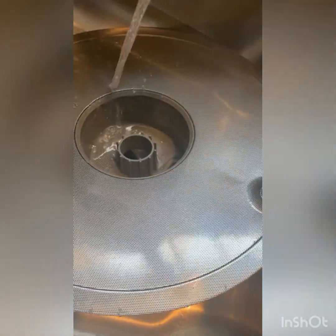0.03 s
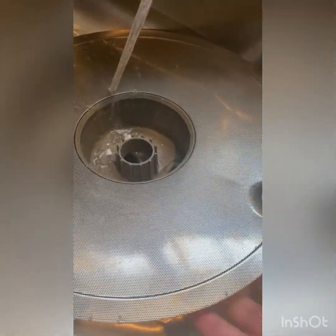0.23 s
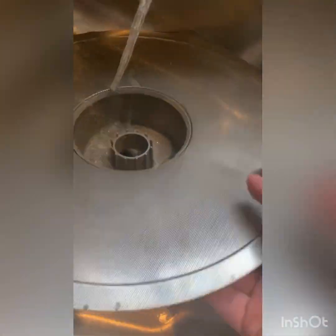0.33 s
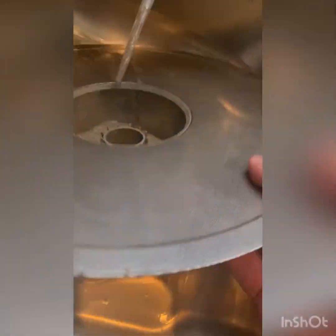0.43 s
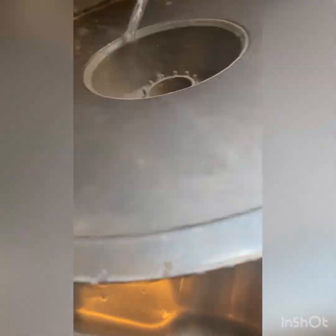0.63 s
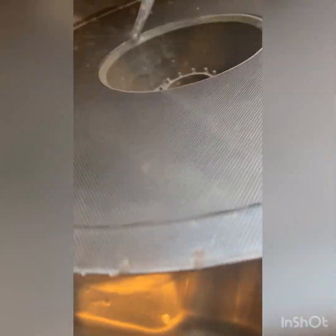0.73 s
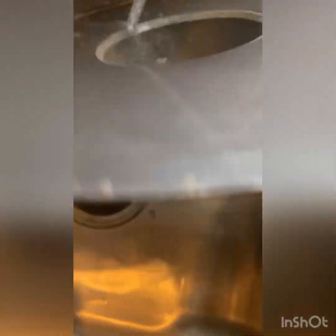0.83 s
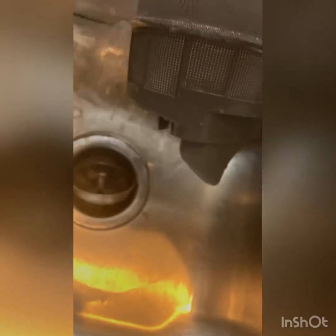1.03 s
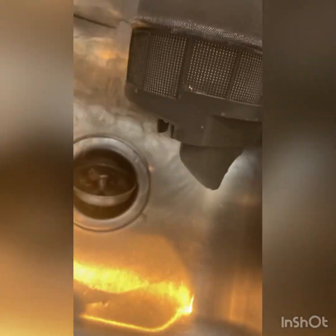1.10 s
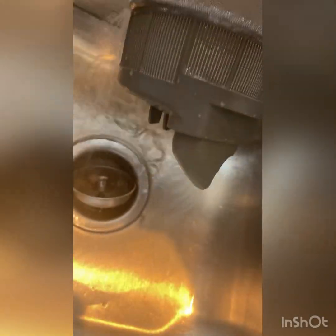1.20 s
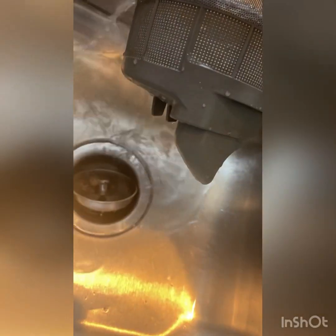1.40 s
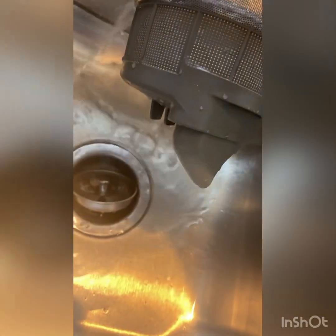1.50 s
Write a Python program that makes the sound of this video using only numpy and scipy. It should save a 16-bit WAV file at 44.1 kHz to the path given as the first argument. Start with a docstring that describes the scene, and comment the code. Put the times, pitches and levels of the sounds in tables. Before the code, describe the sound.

Water sprays and patters in a steel dishwasher while a filter knocks and pulls free.

```python
"""Rinsing a dishwasher filter

A thin jet of water runs into a steel dishwasher tub while a hand lifts out the filter.
The jet sizzles on the filter's mesh plate, then falls past it to patter and drum on the tub floor.
The plate knocks as it is gripped and pulls free with a boom of the tub. Water sloshes and drips
off the filter, and its plastic cup clacks and rubs on its seat."""
import sys
import numpy as np
from scipy import signal
from scipy.fft import rfft, irfft
from scipy.io import wavfile

SR = 44100
rng = np.random.default_rng(int(sys.argv[2]) if len(sys.argv) > 2 else 0)


def store_pcm(level_fs):
    """Save levels as 16-bit WAV."""
    pcm = np.round(np.clip(level_fs, -1, 1) * 32767).astype(np.int16)
    wavfile.write(sys.argv[1], SR, np.atleast_2d(pcm).T)


N = 68355

# A tone table says how strong the low and high parts of a noise are, compared with each other.
# How loud the jet sizzles on the mesh: time_s, level_db
SIZZLE_LEVEL = [(0, -30), (.19, -33.5), (.24, -27), (.33, -27.5), (.41, -32.5), (.46, -29), (.52, -23),
                (.56, -38), (.62, -30.5), (.75, -35), (.9, -50), (1.22, -42), (1.32, -47), (1.55, -75.5)]
# Tone of the sizzle: pitch_hz, level_db
SIZZLE_TONE = [(300, -25), (2000, -19), (3500, -8), (5200, -1), (7500, -2), (9500, 0), (12000, -3),
               (14500, -2.5), (16000, -9)]
# Large drops that spit on the metal: start_s, level_db
SPIT_TIMES = [(.060, -16.5), (0.163, -19.5), (0.338, -18), (0.456, -27), (0.475, -36), (0.608, -20),
              (0.784, -30)]
# Tone of a spit: pitch_hz, level_db
SPIT_TONE = [(300, -25), (2000, -10), (4300, 0), (6000, -1), (16000, -10)]
# Thin notes of the steel under the jet: pitch_hz, width_hz, level_db
STEEL_NOTES = [(4100, 25, -50.5), (4920, 780, -45.5)]
# Tone of the patter on the tub floor: pitch_hz, level_db
PATTER_TONE = [(100, -10), (400, -1), (700, -1), (1300, -2), (2000, -3), (3000, -1), (4400, 1), (5800, 1),
               (7000, -2.5), (10000, -3), (14000, -5), (16000, -11)]
# Tone of the tub's drumming: pitch_hz, level_db
DRUMMING_TONE = [(20, -36), (45, -18), (65, -0.5), (95, -1.5), (120, 8), (155, -1.5), (212, 0.5),
                 (260, -2.5), (320, -12), (450, -15.5), (900, -17.5), (3000, -102)]
# How loud the tub drums: time_s, level_db
DRUMMING_LEVEL = [(0, -31), (.12, -37.5), (.19, -36), (.3, -30), (.42, -40.5), (.7, -30), (.83, -41),
                  (1.05, -36.5), (1.14, -32), (1.27, -34), (1.34, -38), (1.41, -32.5), (1.55, -39.5)]
# Knocks of the filter: start_s, plate_db, tub_db, cup_db, crack_db, hardness_db_per_octave
KNOCK_TIMES = [(0.208, -8.5, -22, -20, -10, 0), (0.2143, -31, -33, -37, -15, 3),
               (0.2304, -28, -21, -23, -17.5, 1), (0.3, -22.5, -25, -46, -19, 3.5),
               (.5180, -13, -3.5, -23, -1.5, -1), (0.73, -27.5, -34.5, -55, -51, 0.5),
               (0.9151, -14.5, -30, 0, -12.5, 0), (0.924, -44, -50, -35, -21.5, -4),
               (0.934, -22, -21.5, -13.5, -49, -1.5), (1.246, -30, -36, -52, -58, -6.5)]
# Notes of the mesh plate: pitch_hz, level_db, ring_s (the time to fade by 60 dB)
PLATE_NOTES = [(202.6, -0.5, 0.087), (266.5, -5, 0.13), (526, 1.5, 0.047), (719, -9.5, 0.11),
               (928, -17, 0.087), (1252, -10.5, 0.076), (1407, -11, 0.045), (1777, -23, 0.17),
               (2390, -19, 0.035), (2705, -23, 0.088), (3540, -19.5, 0.068), (4600, -39, 0.04)]
# Notes of the steel tub: pitch_hz, level_db, ring_s
TUB_NOTES = [(56.7, -14.5, 0.12), (88, 0, 0.068), (128.4, -18, 0.24), (153, 0.5, 0.029), (221, -7.5, 0.11),
             (323.2, -8.5, 0.19), (381.4, 2.5, 0.047), (360, -27.5, 0.69), (536, -10.5, 0.037),
             (552, -26.5, 0.8), (705, -37, 0.62)]
# Notes of the plastic cup: pitch_hz, level_db, ring_s
CUP_NOTES = [(258.7, -4, 0.081), (607, -14, 0.066), (856, -10.5, 0.04), (984, -1, 0.043),
             (1175, -15, 0.071), (1359, -7, 0.032), (1594, -11.5, 0.032), (1987, -12, 0.037),
             (2373, -13, 0.03), (2890, -15, 0.028), (3384, -22.5, 0.06), (3623, -14, 0.017),
             (4527, -14, 0.026)]
# Tone of the crack as two parts meet: pitch_hz, level_db
CRACK_TONE = [(100, 11.5), (700, 1), (1800, 4.5), (2800, -1), (4400, 4.5), (6800, 4.5), (9500, -0.5),
              (13500, 2.5), (16000, -9)]
# Tone of the sheet steel shuddering after a knock: pitch_hz, level_db
SHUDDER_TONE = [(200, -18), (290, 1.5), (365, 4), (410, -13.5), (465, 3), (505, -21), (548, 8.5),
                (620, -9.5), (720, 2.5), (820, -19), (2000, -19), (4000, -19.5), (9000, -30)]
# Water sloshing off the moving filter: start_s, length_s, level_db
SLOSH_TIMES = [(0.211, 0.16, -34), (0.684, 0.1, -40.5), (0.992, 0.066, -37)]
# Tone of a slosh: pitch_hz, level_db
SLOSH_TONE = [(200, -14), (600, 6), (900, 2), (1400, 5.5), (1900, -5), (2600, 5.5), (6000, -17),
              (16000, -44)]
# Booms of the tub wall: start_s, level_db
BOOM_TIMES = [(0.222, -16), (0.532, -7), (0.616, -13)]
# Drips from the lifted filter: start_s, pitch_hz, level_db
DRIP_TIMES = [(0.744, 3860, -24), (0.744, 4440, -22), (.747, 3380, -26), (1.007, 3200, -26.5),
              (1.302, 1257, -31.5), (1.354, 1780, -34), (1.385, 1170, -30.5)]
# Stereo image; left and right swing opposite ways around 8-12 kHz:
# pitch_hz, likeness (1 = alike), left_lead_rad, left_minus_right_db
STEREO = [(60, 1, 0, .7), (260, .995, -.1, 2.7), (370, .95, -.45, 5), (520, .9, -1.35, 3),
          (720, .8, -1.5, -1.5), (960, .7, -.3, -5), (1300, .75, 0, 0), (1850, .8, .2, -.5),
          (2700, .55, .8, -1.5), (4000, .2, 1.5, -1), (6400, .7, 2.15, .3), (8200, .997, 3.05, 0),
          (10000, 1, 3.14, 0), (11600, .997, 3.24, 0), (13500, .6, 4.25, 0)]


def gain(db):
    """Turns decibels into a number to multiply by."""
    return 10 ** (np.asarray(db) / 20)


def normalize(x):
    """Scales a signal so that its average strength (rms) is 1."""
    return x / np.sqrt(np.mean(x ** 2) + 1e-20)


def across_pitch(points, column=1):
    """Fills in one column of a table for every frequency."""
    table = np.array(points, float)
    freq_hz = np.fft.rfftfreq(N, 1 / SR)
    return np.interp(np.log(freq_hz + 1), np.log(table[:, 0] + 1), table[:, column])


def since(start):
    """Seconds since start, zero before it."""
    return np.maximum(np.arange(N) / SR - start, 0)


def level_curve(points):
    """A gain that glides through points of time_s, level_db."""
    return gain(np.interp(since(0), *np.transpose(points)))


def noise(tone, loudness):
    """Noise with a given tone and loudness curve, partly alike on the left and right."""
    first, second = rfft(rng.standard_normal((2, N)) * loudness)
    alike = np.clip(across_pitch(STEREO, column=1), 0, 1)
    common = np.sqrt((1 + alike) / 2) * first
    apart = np.sqrt((1 - alike) / 2) * second
    tone_gain = normalize(gain(across_pitch(tone)))
    return irfft(np.array([common + apart, common - apart]) * tone_gain, N)


def burst(start, rise_s, fall_s):
    """A loudness curve that rises quickly, then dies away."""
    t = since(start)
    return (1 - np.exp(-(t / rise_s) ** 2)) * np.exp(-t / fall_s)


def swell(start, length_s):
    """A loudness curve that rises and falls in one smooth arch."""
    return np.sin(np.pi * np.minimum(since(start) / length_s, 1))


def flicker(per_s, spread_db, fall_s, wash):
    """A loudness curve of tiny random hits of uneven size over a steady wash."""
    sizes = gain(spread_db * np.minimum(rng.exponential(1, N), 3))
    hits = sizes * (rng.random(N) < per_s / SR)
    power = signal.lfilter([1], [1, -np.exp(-2 / (fall_s * SR))], hits ** 2)  # each hit fades
    return normalize(np.sqrt(power / (power.mean() + 1e-20) + wash))


def ring(notes, start, rise_cycles, hardness_db=0):
    """The fading notes of a struck object; a harder hit favours those above 400 Hz."""
    t = since(start)
    sound = np.zeros(N)
    for k, (hz, db, ring_s) in enumerate(notes):
        fade = gain(db + hardness_db * np.log2(hz / 400) - 60 * t / ring_s)
        rise = 1 - np.exp(-(t * hz / rise_cycles) ** 2)
        sound += (-1) ** k * fade * rise * np.sin(2 * np.pi * hz * t)  # every other note is flipped
    return sound


def jet():
    """Fine droplets sizzle on the mesh; a few large ones spit."""
    droplets = flicker(per_s=700, spread_db=5.5, fall_s=.003, wash=.25)
    sizzle = noise(SIZZLE_TONE, level_curve(SIZZLE_LEVEL) * droplets)
    spits = sum(gain(db) * burst(start, rise_s=.0008, fall_s=.0035) for start, db in SPIT_TIMES)
    return sizzle + noise(SPIT_TONE, spits)


def singing_steel():
    """The jet keeps the steel ringing faintly around two high pitches."""
    freq_hz = np.fft.rfftfreq(N, 1 / SR)
    sound = np.zeros((2, N))
    for hz, width_hz, db in STEEL_NOTES:
        hiss = rfft(rng.standard_normal((2, N)))
        band = irfft(hiss / (1 + ((freq_hz - hz) / width_hz) ** 2), N)
        sound += gain(db) * normalize(band)
    return sound


def tub_floor():
    """Water patters on the wet steel and drums out the tub's low notes."""
    drops = flicker(per_s=1300, spread_db=5.5, fall_s=.011, wash=.21)
    patter = noise(PATTER_TONE, gain(-35.5) * drops)
    drumming = flicker(per_s=300, spread_db=2, fall_s=.004, wash=.8)
    return patter + noise(DRUMMING_TONE, level_curve(DRUMMING_LEVEL) * drumming)


def knocks():
    """Each knock makes a sharp crack and rings the plate, tub and cup; the tub shudders on."""
    ringing, crack, shudder = np.zeros((3, N))
    for start, plate_db, tub_db, cup_db, crack_db, hardness_db in KNOCK_TIMES:
        ringing += gain(plate_db) * ring(PLATE_NOTES, start, rise_cycles=1, hardness_db=hardness_db)
        ringing += gain(tub_db) * ring(TUB_NOTES, start, rise_cycles=1, hardness_db=hardness_db)
        ringing += gain(cup_db) * ring(CUP_NOTES, start, rise_cycles=3, hardness_db=hardness_db)
        snap = burst(start, rise_s=.0019, fall_s=.0025)
        tail = gain(-14) * burst(start, rise_s=.0019, fall_s=.012)
        crack += gain(crack_db) * (snap + tail)
        shudder += gain(tub_db - 14.5) * burst(start, rise_s=.0047, fall_s=.07)
    return ringing + noise(CRACK_TONE, crack) + noise(SHUDDER_TONE, shudder)


def sloshes():
    """Short swells of heavier drops run off the filter."""
    swells = sum(gain(db) * swell(start, length_s) for start, length_s, db in SLOSH_TIMES)
    drops = flicker(per_s=290, spread_db=3, fall_s=.0021, wash=.9)
    return noise(SLOSH_TONE, swells * drops)


def booms():
    """The tub's broad wall flexes as the filter lets go: one low note with a soft start."""
    pitch_hz = 128.6
    sound = np.zeros(N)
    for start, db in BOOM_TIMES:
        note = np.sin(2 * np.pi * pitch_hz * since(start))
        sound += gain(db) * burst(start, rise_s=.018, fall_s=.045) * note
    return sound


def drips():
    """Single drips plink into the puddle."""
    ring_s = .03
    return sum(ring([(hz, db, ring_s)], start, rise_cycles=1.7) for start, hz, db in DRIP_TIMES)


def cup_scrape():
    """The cup rubs on its seat: tiny slips ring it, and the contact cuts each ring short."""
    slips = rng.standard_normal(N) * swell(start=1.02, length_s=.073)
    slips *= flicker(per_s=250, spread_db=4, fall_s=.003, wash=.5)
    short_notes = [(hz, db, ring_s * .35) for hz, db, ring_s in CUP_NOTES]
    cup = ring(short_notes, start=0, rise_cycles=1, hardness_db=-4.5)
    return gain(-33) * signal.fftconvolve(slips, cup / np.linalg.norm(cup))[:N]


def scene():
    """Running water and the handled filter, close by."""
    running_water = jet() + singing_steel() + tub_floor()
    return running_water + knocks() + sloshes() + booms() + drips() + cup_scrape()


def record(dry):
    """Sets left-right phase and balance by pitch, rounds off the peaks and cuts the top treble."""
    ceiling, cutoff_hz = .92, 15900
    left_gain = gain(across_pitch(STEREO, column=3) / 2)
    left = left_gain * np.exp(.5j * across_pitch(STEREO, column=2))
    stereo = irfft(rfft(dry) * np.array([left, 1 / left]), N)  # the right gets the opposite change
    rounded = stereo / (1 + (stereo / ceiling) ** 6) ** (1 / 6)
    treble_cut = signal.firwin(511, cutoff_hz, window=("kaiser", 9), fs=SR)
    return signal.oaconvolve(rounded, treble_cut[None], "same")


dry = scene()
out = record(dry)
store_pcm(out)
```